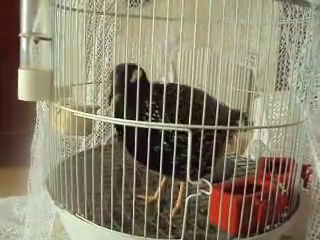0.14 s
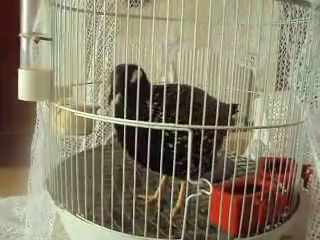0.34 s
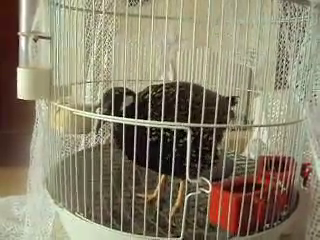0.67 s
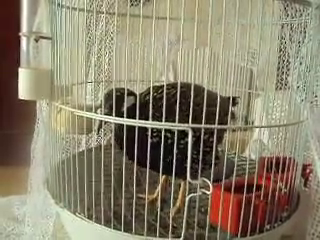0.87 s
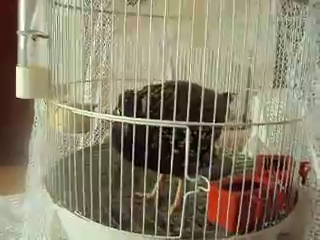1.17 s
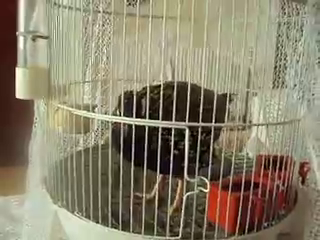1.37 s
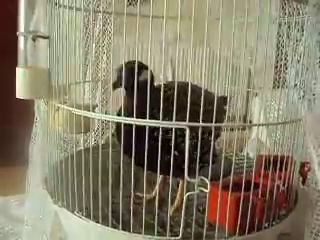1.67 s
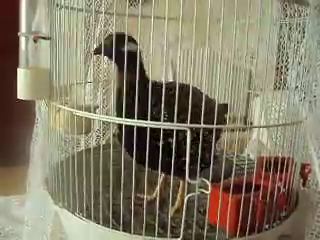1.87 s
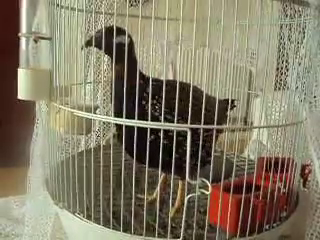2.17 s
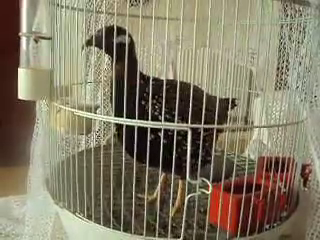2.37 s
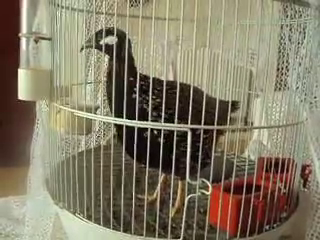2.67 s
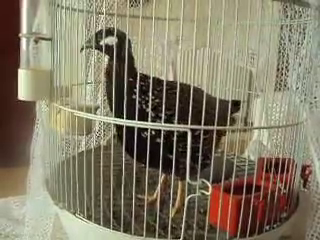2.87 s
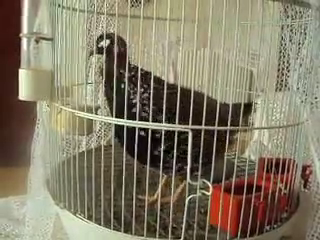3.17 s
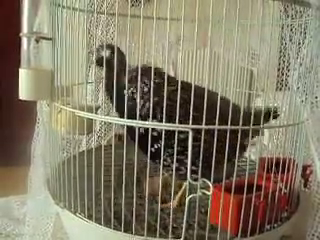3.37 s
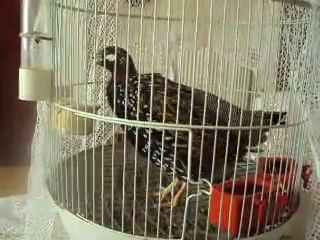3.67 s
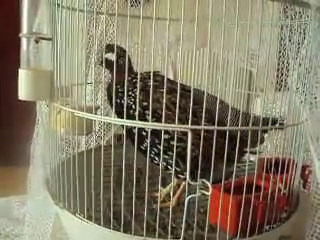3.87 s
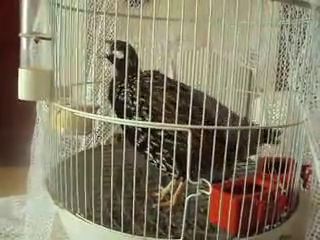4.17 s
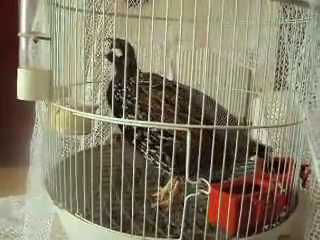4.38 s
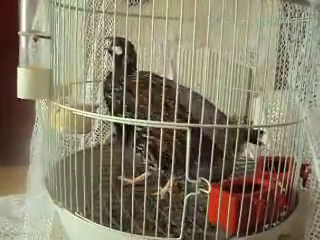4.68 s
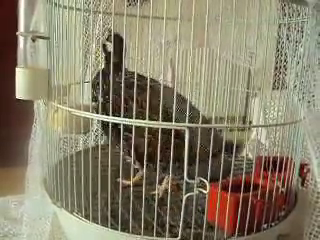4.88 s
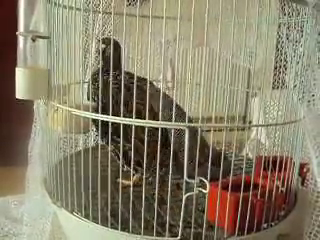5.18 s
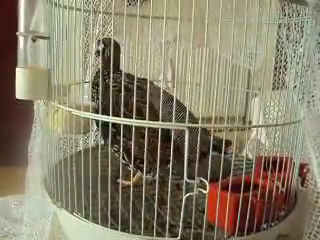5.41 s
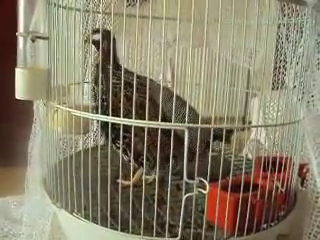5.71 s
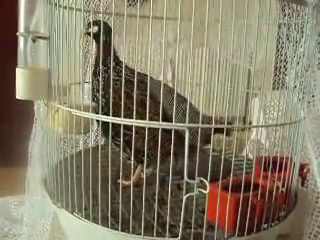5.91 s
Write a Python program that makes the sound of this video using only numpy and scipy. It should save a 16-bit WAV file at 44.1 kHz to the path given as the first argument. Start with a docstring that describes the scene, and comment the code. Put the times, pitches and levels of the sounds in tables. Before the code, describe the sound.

One high peep, a raspy cluck and four harsh, slightly distorted bird squawks sound over a faint idling engine outside.

```python
"""A francolin in a wire cage

In a quiet room, close to a small camera, the bird gives a rising peep, a squeaky cluck and four harsh
squawks that overload the microphone. Its voice box (syrinx) whistles when it vibrates cleanly and rasps
when driven hard. Its feet stir on the cage floor, and an engine idles somewhere outside."""
import sys
import numpy as np
from scipy import signal
from scipy.fft import rfft, irfft, next_fast_len
from scipy.io import wavfile
from scipy.ndimage import uniform_filter1d

SR = 44100
rng = np.random.default_rng(int(sys.argv[2]) if len(sys.argv) > 2 else 0)


def master(y):
    """Save y as 16-bit WAV."""
    cut = np.clip(np.atleast_2d(y).T, -1, 1)
    pcm = np.round(cut * 32767)  # scale
    wavfile.write(sys.argv[1], SR, pcm.astype(np.int16))


N = 266760
TIME = np.arange(N) / SR


def gain_of(db):
    """Turns decibels into a number to multiply a sound by."""
    return 10 ** (np.asarray(db) / 20)


def evened(x):
    """Scales a signal to an average strength (rms) of 1."""
    return x / np.sqrt(np.mean(x ** 2) + 1e-20)


def read(points, hz):
    """Reads between the rows of a frequency table, spacing octaves evenly."""
    f, value = np.transpose(points)
    return np.interp(np.log(hz + 1), np.log(f + 1), value)


def add(mix, start, sound):
    """Mixes a sound in, start seconds from the beginning."""
    part = mix[round(start * SR):][:len(sound)]
    part += sound[:len(part)]


def noise(points):
    """Steady noise of strength 1, shaped by rows of f/Hz, relative level/dB."""
    size = next_fast_len(N, True)
    shape = gain_of(read(points, np.fft.rfftfreq(size, 1 / SR)))
    return evened(irfft(rfft(rng.standard_normal(size)) * shape, size)[:N])


def wander(hz, count=16384):
    """A random drift of strength 1 that changes up to about hz times a second."""
    t = np.linspace(0, N / SR, count)
    damping = 1 + (np.fft.rfftfreq(count, t[1]) / hz) ** 4
    drift = irfft(rfft(rng.standard_normal(count)) / damping, count)
    return np.interp(TIME, t, evened(drift))


def resonate(x, hz, width_hz):
    """A resonance: keeps the sound near the frequency hz, which may move."""
    turn = np.exp(2j * np.pi * np.cumsum(hz * np.ones(len(x))) / SR)
    r = np.exp(-np.pi * width_hz / SR)
    return 2 * (turn * signal.lfilter([(1 - r) ** 2], [1, -2 * r, r * r], x / turn)).real


def cut_lows(x, hz, order):
    """Weakens everything below hz; a higher order cuts more steeply."""
    return signal.sosfilt(signal.butter(order, hz, "high", fs=SR, output="sos"), x)


def fades(t, rise_s, fall_s):
    """Soft start and end of a note."""
    return np.clip((t - t[0]) / rise_s, 0, 1) * np.clip((t[-1] - t) / fall_s, 0, 1)


def air(level_db=-61.5, rises_at_s=0.992, rise_s=0.098, rise_db=5.5, ease_s=4):
    """The room's steady rumble and hiss; the background grows louder once, then eases back."""
    # room noise: f/Hz, relative level/dB
    spectrum = [(15, -17.5), (40, -6.5), (110, -10.5), (200, -6.5), (260, -7), (450, -11), (1000, -17),
                (2500, -22.5), (5000, -23.5), (5800, -31.5), (7000, -56)]
    since = np.maximum(TIME - rises_at_s, 0)
    swell = np.minimum(since / rise_s, 1) * np.exp(-since / ease_s)
    return noise(spectrum) * gain_of(level_db + rise_db * swell)


def whine(end_s=1.025):
    """A faint steady tone and its third harmonic, which stop early on."""
    tones = [(500.6, -70), (1502, -80.5)]  # f/Hz, level/dB
    tone = sum(np.sqrt(2) * gain_of(db) * np.sin(2 * np.pi * hz * TIME) for hz, db in tones)
    return tone * np.clip((end_s - TIME) / .05, 0, 1)


def engine(waver_db=1.33, uneven_db=1.41, boost_db=2):
    """Only the idling engine's lowest tones pass the walls; its firings are uneven in strength."""
    # idling speed: t/s, firing rate/Hz
    firing_rate = [(0, 28.08), (2.4, 27.95), (3.6, 28.63), (4.8, 27.05), (5.5, 30.76), (6.05, 29.47)]
    # engine tones, one list for each of three bands: multiple of the firing rate, relative level/dB
    bands = [
        [(1, -13), (2, -6.5), (3, -10.5), (4, -1)],
        [(5, -7.5), (5.5, -18), (6, -3.5)],
        [(6.5, -12.5), (7, -0.5), (7.5, -14)],
    ]
    # band levels before the boost: t/s, low boom/dB, middle drone/dB, upper drone/dB
    band_levels = [(0.0, -63, -62.5, -65), (0.57, -55.5, -68, -55.5), (0.91, -58, -63, -59.5),
                   (1.23, -47.5, -51.5, -52.5), (2.2, -49.5, -46.5, -58.5), (2.64, -55.5, -48.5, -49.5),
                   (3.09, -49.5, -54.5, -53.5), (3.46, -52.5, -53.5, -61), (3.72, -47, -52, -53),
                   (3.95, -45.5, -50, -60.5), (5.55, -49, -49, -57), (5.644, -49, -50, -56.5),
                   (6.049, -51, -53, -48.5)]
    times, *levels = np.transpose(band_levels)
    firings = np.cumsum(np.interp(TIME, *np.transpose(firing_rate))) / SR
    out = np.zeros(N)
    for tones, band_db in zip(bands, levels):
        hum = np.zeros(N)
        for multiple, db in tones:
            strength = gain_of(db + waver_db * wander(5.1))
            hum += strength * np.sin(2 * np.pi * (multiple * firings + rng.random()))
        hum = evened(hum * gain_of(uneven_db * wander(13)))
        out += hum * gain_of(np.interp(TIME, times, band_db) + boost_db)
    return out


def steps(width_hz=720):
    """Claws make dull taps and scuffs on the cage's plastic tray."""
    # footfalls: t/s, level/dB, ring/Hz, time to fade by 60 dB/s, rise/s
    footfalls = [(1.020, -68.5, 300, 0.12, 0.0054), (1.631, -40.5, 572, 0.182, 0.00206),
                 (1.649, -49.5, 704, 0.133, 0.0038), (3.192, -49, 849.5, 0.1024, 0.00197),
                 (3.215, -44, 773, 0.273, 0.0315), (3.510, -51.5, 890, 0.35, 0.002),
                 (5.539, -53, 704, 0.22, 0.009), (5.70, -55, 801, 0.26, .03),
                 (5.785, -51.5, 746, 0.354, 0.0278)]
    out, t = np.zeros(N), np.arange(SR // 4) / SR
    for start, db, hz, fade_s, rise_s in footfalls:
        scuff = evened(resonate(rng.standard_normal(len(t)), hz, width_hz))
        add(out, start, scuff * gain_of(db - 60 * t / fade_s) * fades(t, rise_s, 0.0091))
    return out


def whistle(hz, jitter, hiss_db, hoarsening_db):
    """The syrinx vibrates cleanly: a slightly unsteady tone that turns hoarse towards its end."""
    count = len(hz)
    pitch = hz * (1 + jitter * wander(580)[:count])
    tone = np.sqrt(2) * np.sin(2 * np.pi * np.cumsum(pitch) / SR)
    hiss = noise([(2000, -23.5), (3500, -3.5), (5000, 2), (6000, -16.5), (8000, -50)])[:count]
    return tone + hiss * gain_of(hiss_db + hoarsening_db * np.linspace(0, 1, count))


def peep(start_s=1.055, length_s=.142, from_hz=2290, to_hz=3707, glide_s=.044,
         soft_db=-48, full_db=-27, sag_db_per_s=-44, opens_after_s=0.0285, rise_s=0.0078):
    """One whistle glides up and levels off; it starts softly, opens to full voice, sags and dies away."""
    out, t = np.zeros(N), np.arange(0, length_s, 1 / SR)
    hz = to_hz + (from_hz - to_hz) * np.exp(-t / glide_s)
    since = t - opens_after_s
    full_voice = np.clip(since / rise_s, 0, 1) * gain_of(full_db + sag_db_per_s * since)
    loudness = (gain_of(soft_db) + full_voice) * fades(t, .003, 0.0422)
    add(out, start_s, loudness * whistle(hz, jitter=0.0142, hiss_db=-31.5, hoarsening_db=13))
    return out


def squeaks():
    """Brief whistles inside the cluck and squawks, each swelling and fading in one arch."""
    # squeaks: t/s, length/s, from/Hz, to/Hz, level/dB, bend (1 = straight glide, more = late glide)
    glides = [(3.545, 0.0123, 3896, 3000, -17.5, 3.33), (3.553, 0.0185, 3041, 1100, -28, 0.86),
              (3.554, 0.01196, 5463, 3600, -20.5, 0.98), (3.583, 0.0182, 4378, 3450, -18.5, 0.671),
              (3.610, .019, 3239, 4199, -18, 1.1), (4.432, 0.0369, 4020, 4180, -19.5, 1.6),
              (4.455, 0.0574, 3102, 3200, -22, 0.71), (4.472, 0.0494, 3980, 3980, -24, 1),
              (4.545, 0.06, 5509, 5490, -17.5, 1.3), (4.994, 0.0088, 1342, 1550, -25, 1.9),
              (5.035, .06, 4857, 4840, -21.5, 2.15), (5.072, 0.026, 2934, 2920, -20, 0.85)]
    out = np.zeros(N)
    for start, length, from_hz, to_hz, db, bend in glides:
        progress = np.linspace(0, 1, round(length * SR))
        hz = from_hz + (to_hz - from_hz) * progress ** bend
        arch = np.sin(np.pi * progress) * gain_of(db)
        add(out, start, arch * whistle(hz, jitter=.006, hiss_db=-32.5, hoarsening_db=16.5))
    return out


def syrinx(jitter, breath_share, flutter_db=0.5):
    """Driven hard, the membranes slap chaotically: uneven pulses, each with a puff of air."""
    pitch_hz = 788.7 * (1 + jitter * wander(220))
    cycles = np.cumsum(pitch_hz) / SR
    pulses = evened(sum(np.cos(2 * np.pi * k * cycles) for k in range(3, 9)))
    breath = noise([(1500, -23.5), (2700, -1), (6200, -9.0), (8000, -36.0)])
    puffs = evened(np.exp(-(cycles % 1) / 0.44) * breath)
    return ((1 - breath_share) * pulses + breath_share * puffs) * gain_of(flutter_db * wander(130))


def throat(drive, resonances, sway=0.024):
    """The throat rings like a tube; its resonances alternate in sign and sway as the neck moves."""
    stretch = 1 + sway * wander(19)[:len(drive)]
    return evened(sum((-1) ** k * gain_of(db) * resonate(drive, hz * stretch, width)
                      for k, (hz, width, db) in enumerate(resonances)))


def cluck(start_s=3.554, length_s=0.0909, level_db=-25.5, swell_db_per_s=12.5, catch_s=0.0023):
    """A short rasp through a wide open throat, stuttering where the voice catches."""
    # resonances of the open throat: f/Hz, width/Hz, relative level/dB
    open_throat = [(2705, 970, -3), (3900, 1400, -1), (5250, 1400, 2)]
    catches = [(3.584, 9.35), (3.624, 9.1), (3.636, 7.7)]  # t/s, level above the rasp/dB
    out, t = np.zeros(N), np.arange(0, length_s, 1 / SR)
    stutter_db = sum(db * np.exp(-((start_s + t - at) / catch_s) ** 2) for at, db in catches)
    loudness = gain_of(level_db + swell_db_per_s * t + stutter_db) * fades(t, 0.01, .004)
    drive = cut_lows(syrinx(jitter=.2, breath_share=1.0)[:len(t)], hz=2250, order=4)
    add(out, start_s, throat(drive, open_throat) * loudness)
    return out


def squawks(trim_db=-1, middle_trim_db=-3, high_trim_db=1, surge_db=2, surge_after_s=0.05136,
            sink_hz_per_s=954, brightening_db_per_s=5):
    """The rough syrinx sounds through the throat in surges; its low resonance sinks during each call."""
    # squawks, levels before the trims: t/s, length/s, effort/dB, rise/s, surge rate/Hz,
    # low resonance/Hz, middle resonances/dB, high resonances/dB (both against the low one)
    calls = [(4.054, 0.18906, -15, 0.00252, 17.08, 3323, 3.15, -2),
             (4.431, 0.2444, -18.5, 0.0063, 10.02, 3146, -0.14, 0),
             (4.997, .102, -19, 0.0086, 8.86, 3052, -0.24, 0),
             (5.142, 0.1807, -21, 0.0079, 13.1, 3084, 0.62, 4)]
    # middle throat resonances: f/Hz, width/Hz, relative level/dB
    middle_resonances = [(3550, 650, -3), (4080, 700, 0)]
    # high throat resonances: f/Hz, width/Hz, relative level/dB
    high_resonances = [(4620, 650, -6), (4990, 600, 0), (5500, 550, -1)]
    # weak windpipe resonance: f/Hz, width/Hz, level against the low resonance/dB
    windpipe = (1200, 440, -21.5)
    pipe_hz, pipe_width, pipe_db = windpipe
    source = cut_lows(syrinx(jitter=.13, breath_share=0.3764), hz=2760, order=9)
    out = np.zeros(N)
    for start, length, effort_db, rise_s, surge_hz, low_hz, middle_db, high_db in calls:
        t = np.arange(0, length, 1 / SR)
        drive = source[round(start * SR):][:len(t)]
        low = evened(resonate(drive, low_hz - sink_hz_per_s * t, width_hz=460))
        middle = gain_of(middle_db + middle_trim_db) * throat(drive, middle_resonances)
        high = gain_of(high_db + high_trim_db) * throat(drive, high_resonances)
        brightening = gain_of(brightening_db_per_s * (t - length / 2))
        breath = gain_of(pipe_db) * evened(resonate(rng.standard_normal(len(t)), pipe_hz, pipe_width))
        voice = low - (middle + high) * brightening + breath  # signs alternate along the tube
        throb_db = surge_db * np.cos(2 * np.pi * surge_hz * (t - surge_after_s))
        add(out, start, voice * gain_of(effort_db + throb_db + trim_db) * fades(t, rise_s, 0.01))
    return out


def room(x, delay_s=.004):
    """The room sends back scattered echoes, each frequency dying away at its own speed."""
    # room echo: f/Hz, time to fade by 60 dB/s
    fade_times = [(300, .28), (1300, 0.45), (3000, 0.4053), (5500, 0.3803)]
    spacing = 12  # one echo falls at random in every 12 samples
    count = SR // spacing
    echoes = np.zeros(SR)
    echoes[np.arange(count) * spacing + rng.integers(0, spacing, count)] = rng.choice([-1., 1.], count)
    hz, t, bands = signal.stft(echoes * (TIME[:SR] > delay_s), SR, nperseg=256)
    decay = gain_of(-60 * t / read(fade_times, hz)[:, None])
    tail = signal.istft(bands * decay, SR, nperseg=256)[1]
    return signal.fftconvolve(x, tail / np.linalg.norm(tail))[:N]


def scene(rasp_echo_db=2, harsh_echo_db=-1.5, clear_echo_db=-6):
    """The bird and its echoes over the engine, the whine and the room noise, in mono."""
    rasp = cluck()
    harsh = squawks() + steps()
    clear = peep() + squeaks()
    echoes = room(gain_of(rasp_echo_db) * rasp + gain_of(harsh_echo_db) * harsh
                  + gain_of(clear_echo_db) * clear)
    return (rasp + harsh + clear + echoes + engine() + whine() + air())[None]


def record(dry, top=0.31, bottom=0.84, grit_db=-27, crackle_db=-21, crackle_onset=0.1787, offset=.0033):
    """The input overloads lopsidedly and crackles, loses its treble, then clips the tallest peaks."""
    # crackle of the overloaded input: f/Hz, relative level/dB
    crackle_spectrum = [(20, -9.5), (130, 1), (230, 3), (500, 3.5), (1000, 1), (1800, -3), (3000, -2.5),
                        (5500, -26.5)]
    x = dry[0]
    limit = np.where(x > 0, top, bottom)
    squashed = x / (1 + (x / limit) ** 6) ** (1 / 6)
    level = np.sqrt(abs(uniform_filter1d(x ** 2, size=90)))
    overload = level ** 4 / (level ** 4 + crackle_onset ** 4)
    grit = gain_of(grit_db) * uniform_filter1d(level, size=900)  # rides faintly on all sound
    squashed += noise(crackle_spectrum) * (grit + gain_of(crackle_db) * overload)
    thinned = cut_lows(squashed, hz=45, order=1) + offset
    treble_cut = signal.firwin(131, 5823, window=("kaiser", 8), fs=SR)  # keeps sound below 5823 Hz
    clipped = np.clip(signal.oaconvolve(thinned, treble_cut, "same"), -.71, .74)
    smoothing = signal.firwin(511, 15850, window=("kaiser", 9), fs=SR)  # rounds the clipped corners
    return signal.oaconvolve(clipped, smoothing, "same")[None]


dry = scene()
out = record(dry)
master(out)
```